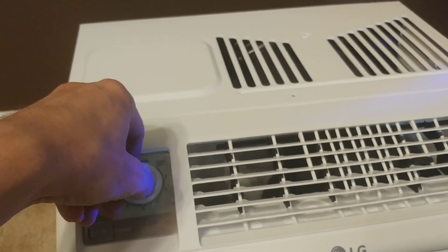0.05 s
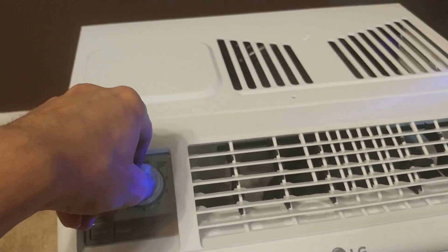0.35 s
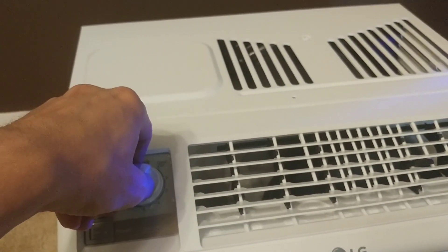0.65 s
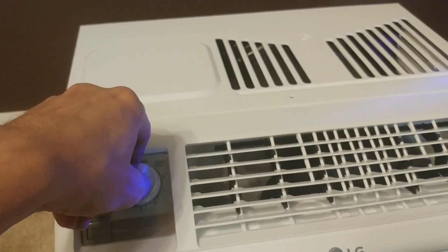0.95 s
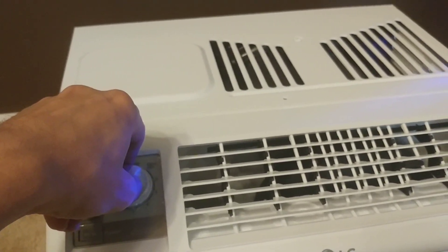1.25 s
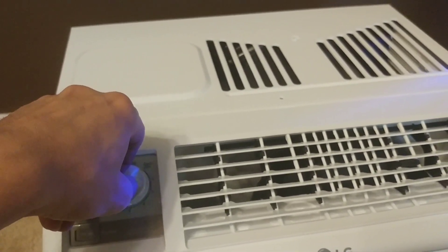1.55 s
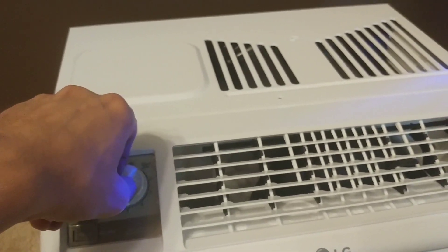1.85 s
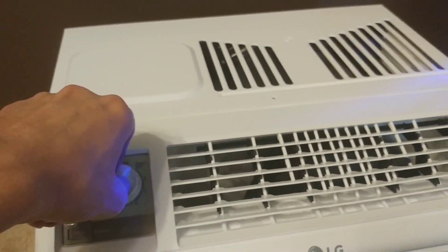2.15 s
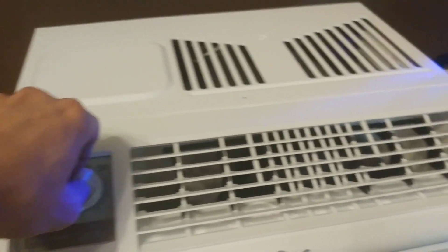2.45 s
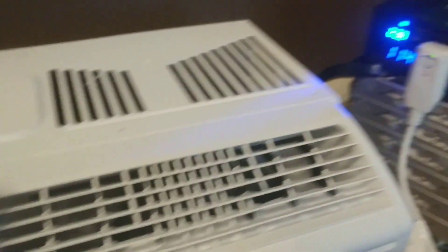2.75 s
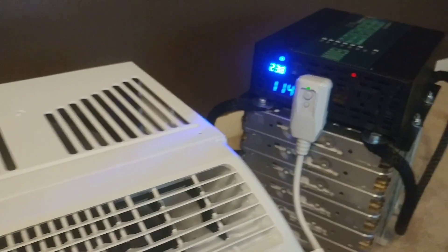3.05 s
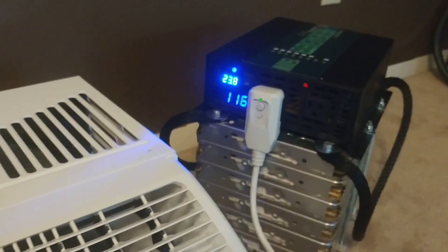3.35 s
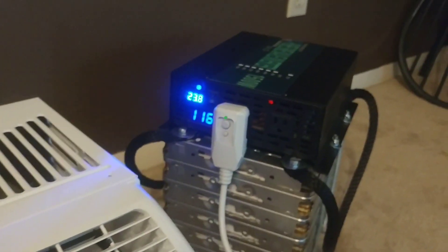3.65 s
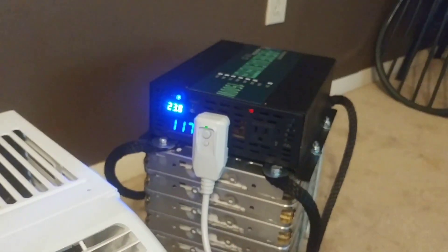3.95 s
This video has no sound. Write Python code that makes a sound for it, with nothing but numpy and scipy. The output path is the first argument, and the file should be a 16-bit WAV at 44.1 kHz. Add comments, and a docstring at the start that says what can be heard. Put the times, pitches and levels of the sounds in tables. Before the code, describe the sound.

A window air conditioner blows, growls briefly, then its compressor catches and hums with a rattle.

```python
"""In a small room, just in front of its grille, a window air conditioner runs from an inverter.
The fan blows throughout, and puffs of its air strike the microphone. The stalled compressor motor
growls for a second while the inverter sizzles and the fan sags. Then the compressor catches and hums,
knocking once a turn and ringing its casing. Late on the listener leans in and moves to the side."""
import sys
import numpy as np
from scipy import signal
from scipy.fft import rfft, irfft
from scipy.io import wavfile
from scipy.ndimage import uniform_filter1d, map_coordinates

SR = 44100
rng = np.random.default_rng(int(sys.argv[2]) if len(sys.argv) > 2 else 0)


def to_wav(sig):
    """Store sig (one row per channel, or 1-D mono) as 16-bit WAV at the path in sys.argv[1].

    Samples outside -1..1 are clipped; the rate is SR.
    """
    pcm = np.clip(np.atleast_2d(sig), -1, 1) * 32767
    pcm = np.round(pcm).astype(np.int16)
    wavfile.write(sys.argv[1], SR, pcm.T)  # frames by channels


N = 176400
T, HZ = np.arange(N) / SR, np.fft.rfftfreq(N, 1 / SR)
MAINS_HZ, TURN_HZ = 60, 59.4

# Spectra of the noises. Each row: frequency in Hz, relative density in dB.
RUSH_SPECTRUM = [(170, -4), (210, -2.5), (265, -3), (320, -2.5), (390, -10), (480, -2.5), (560, 1.5),
                 (650, -2), (750, -1), (860, -3), (1000, -11.5), (1170, -7.5), (1400, -17), (1900, -27.5),
                 (2600, -29.5)]
GRILLE_SPECTRUM = [(1000, -3), (2200, 4.5), (4500, 5.5), (6800, 1), (8200, -8.5), (9000, -22), (15000, -19)]
DRAUGHT_SPECTRUM = [(20, -38), (40, -2.5), (68, 4.5), (95, 0.5), (160, -10.5), (230, -12.5), (400, -39)]
SIZZLE_SPECTRUM = [(1290, -48), (2200, -27), (2720, -14), (3150, -16), (3260, -14), (4700, 1), (4940, -5),
                   (5360, -18), (5820, -8), (6260, -19.5), (7930, -11), (8750, -22), (9890, -19),
                   (13200, -25.5), (15500, -23.5)]
INVERTER_HISS_SPECTRUM = [(7000, -28), (9000, -29), (9700, 9), (13000, 9), (15500, -11)]
CLUNK_SPECTRUM = [(150, 3), (600, 5), (1500, -13), (2600, -7), (5000, -28)]
# Envelopes of the sources. Each row: time in seconds, gain in dB.
RUSH_LEVEL = [(0, -34.5), (.38, -31.5), (.55, -35), (.8, -36.5), (1.12, -38.5), (1.33, -35), (1.5, -37),
              (1.9, -36.5), (2.5, -36.5), (4, -33.5)]
FAN_HUM_LEVEL = [(0, -38), (.35, -39.5), (.7, -45.5), (1.3, -42), (1.7, -40.5), (2.2, -47), (2.6, -40.5),
                 (4, -42)]
GROWL_LEVEL = [(.3, -54), (.38, -29.5), (.5, -42.5), (.65, -42.5), (.76, -42.5), (1, -38.5), (1.32, -39),
               (1.42, -26)]
CHIRP_LEVEL = [(.32, -41), (.42, -33), (.53, -40), (.7, -58), (.745, -34.5), (1.0, -35.5), (1.22, -38),
               (1.3, -59)]
INVERTER_HISS_LEVEL = [(1.25, -90), (1.35, -67), (1.5, -70), (1.62, -65), (2.6, -63.5), (3, -66.5),
                       (4, -66.5)]
HUM_LEVEL = [(1.25, -55), (1.39, -29.5), (1.52, -26.5), (1.7, -28.5), (2.9, -28.5), (4, -28)]
BUZZ_LEVEL = [(1.25, -54.5), (1.4, -45), (1.52, -36.5), (1.65, -33.5), (2.1, -29), (2.7, -30), (3.1, -31.5),
              (4, -38)]
KNOCK_LEVEL = [(1.24, -37), (1.34, -10), (1.42, -13.5), (1.51, -10), (1.58, 0), (1.75, 1.5), (2.7, 1.5),
               (3.2, 0), (3.7, 0), (4, -0.5)]
# Stereo balance. Each row: frequency in Hz, left minus right in dB.
FAN_PAN = [(200, -2), (400, 2.5), (600, 2.5), (850, 1.5), (1150, 5.5), (1600, 5), (2500, -17)]
TREBLE_PAN = [(1300, 5.5), (1900, -1), (2500, -3.5), (3300, -11.5), (4600, -12.5), (6300, -25.5),
              (8000, -20.5), (12000, -16)]
# Coherence of the rush. Each row: frequency in Hz, correlation of left and right.
RUSH_COHERENCE = [(200, 1), (600, 0.88), (1100, 0.73), (2500, 0.25)]
# Puffs of air. Each row: centre in seconds, half width in seconds, level in dB.
PUFFS = [(.01, 0.01, -24), (0.245, 0.042, -27.5), (0.631, 0.014, -27), (.735, 0.011, -19.5),
         (0.908, 0.017, -30), (1.066, 0.021, -28), (1.217, 0.013, -32.5), (1.427, 0.056, -33.5),
         (1.547, 0.016, -25), (2.139, 0.016, -26), (2.374, 0.029, -27.5), (2.42, 0.011, -26.5),
         (2.866, 0.024, -30.5), (3.07, 0.029, -34)]
# Pitch of the sizzle. Each row: time in seconds, frequency ratio.
SIZZLE_PITCH = [(.32, 0.98), (.5, 0.97), (.66, 0.91), (.75, 1), (1.05, 0.99), (1.2, 0.99), (1.35, .94)]
# Speed of the compressor. Each row: time in seconds, turns per second.
ROTOR_SPEED = [(1.3, 61), (1.45, 60.6), (1.53, 58.6), (1.62, 59.8), (1.9, 59.7), (2.2, 59.4), (3, 59.35),
               (3.25, 59.2), (4, 59.35)]
# Harmonics of the buzz at two positions. Each row: multiple of the turning rate, relative level in dB.
ORDERS_FRONT = [(3, -26), (4, -18.5), (5, -7.5), (6, -17.5), (7, -15.5), (8, -14.5), (9, -13.5), (10, -26),
                (11, -16), (12, -10), (13, -17.5), (14, -11), (15, -16.5), (16, -25), (17, -23.5),
                (18, -23.5), (19, -14), (20, -39), (21, -14.5), (22, -17), (23, -21.5)]
ORDERS_SIDE = [(3, -16), (4, -27), (5, -6.5), (6, -32), (7, -27.5), (8, -18), (9, -13), (10, -20.5),
               (11, -17.5), (12, -21), (13, -13.5), (14, -12), (15, -19.5), (16, -22), (17, -22), (18, -22),
               (19, -16.5), (20, -30), (21, -26), (22, -19), (23, -28.5)]
# Response of the casing at three positions. Each row: frequency in Hz, relative density in dB.
CASING_FRONT = [(790, -29), (1350, -1.5), (1380, -20), (1830, -21), (1870, -26), (2020, -14.5), (2470, -17),
                (2610, -20), (3080, -18), (3420, -21.5), (4370, -19), (4580, -31), (5160, -14.5),
                (5600, -30), (5740, -12.5), (5960, -9.5), (6980, -10.5), (9000, -43), (11700, -72),
                (19800, -120)]
CASING_CLOSE = [(790, -25), (1350, -2.5), (1650, -6.5), (1690, -19), (1830, -11.5), (2800, -17),
                (3080, -4.5), (3420, -11.5), (4370, -17), (4730, -32), (5080, -10), (5630, -9),
                (5910, -3.5), (6870, 0.5), (9000, -36), (11700, -65), (19800, -120)]
CASING_SIDE = [(790, -38), (1350, -19), (1380, -0.5), (1530, -7), (1690, -9), (1900, -7.5), (1990, -12),
               (2140, -10), (2320, -19), (2410, -11.5), (2780, -9), (3130, -6), (3470, -20.5), (3880, -14),
               (5460, -13.5), (5600, -20), (5730, -2.5), (5960, -2), (7150, -7.5), (9000, -38),
               (11700, -65), (19800, -120)]
# Harmonics that the casing singles out. Each row: frequency in Hz, relative level in dB.
RINGS_FRONT = [(1486, -57), (1604, -61), (1787, -63), (2024, -68), (2083, -65), (2202, -64), (2379, -62),
               (2439, -58), (2498, -68), (2616, -68), (2740, -59), (2972, -55), (3090, -65), (3155, -64),
               (3208, -66), (3268, -63)]
RINGS_CLOSE = [(2433, -59), (2966, -58), (4274, -63), (5222, -55), (5997, -53), (6115, -52), (6352, -54),
               (6708, -54), (7063, -53), (7359, -63)]
RINGS_SIDE = [(1604, -61), (1841, -59), (1900, -58), (2073, -64), (2907, -62), (3144, -62), (3203, -62),
              (4032, -63), (4570, -65), (4985, -66), (5222, -65), (5755, -58), (6051, -57), (6288, -62)]
# Phase between the microphone ports. Each row: frequency in Hz, lead of the left in radians.
PORT_PHASE = [(0, 0), (600, -.25), (1150, -1), (1900, -1.7), (2400, -2.2), (3190, -4.5), (6600, -9)]


def from_db(db):
    """Amplitude grows tenfold in 20 dB."""
    return 10 ** (np.asarray(db) / 20)


def rms_one(x):
    """Normalisation to unit mean power."""
    return x / np.sqrt(np.mean(x ** 2) + 1e-20)


def in_time(rows):
    """Linear interpolation of a curve at every sample."""
    return np.interp(T, *np.transpose(rows))


def at_hz(points, hz=HZ):
    """Interpolation on a logarithmic frequency axis."""
    freqs, values = np.transpose(points)
    return np.interp(np.log(hz + 1e-6), np.log(freqs), values)


def colour(points, hz):
    """A magnitude response that falls 48 dB per octave beyond its ends."""
    octaves_outside = np.abs(np.log2((hz + 1e-6) / np.clip(hz, points[0][0], points[-1][0])))
    return from_db(at_hz(points, hz) - 48 * octaves_outside)


def pan(db):
    """A level difference, left minus right, at constant power."""
    gains = from_db(np.atleast_1d(db) * np.array([[.5], [-.5]]))
    return gains / np.sqrt(np.mean(gains ** 2, axis=0))


def noise(spectrum, pan_db, coherence):
    """Independent mid and side noises add to a partly coherent pair of unit power."""
    mid, side = rfft(rng.standard_normal((2, N)))
    pair = np.sqrt(1 + coherence) * mid + np.sqrt(1 - coherence) * side * [[1], [-1]]
    return rms_one(irfft(pair * colour(spectrum, HZ) * pan(pan_db), N))


def drift(rate_hz):
    """Low-pass noise gives a slow fluctuation of unit power."""
    return rms_one(irfft(rfft(rng.standard_normal(N)) / (1 + (HZ / rate_hz) ** 2), N))


def swell(centre_s, half_s):
    """A Gaussian rise and fall."""
    return np.exp(-.5 * ((T - centre_s) / half_s) ** 2)


def fan(grille_db=-49.5):
    """Turbulence in blower and grille radiates broadband noise; the motor hums at twice the mains rate."""
    rush = noise(RUSH_SPECTRUM, at_hz(FAN_PAN), at_hz(RUSH_COHERENCE))
    rush *= from_db(in_time(RUSH_LEVEL) + 1.36 * drift(9.1))
    hiss = noise(GRILLE_SPECTRUM, at_hz(TREBLE_PAN), coherence=.041) * from_db(grille_db)
    hum = np.sqrt(2) * np.sin(4 * np.pi * MAINS_HZ * T)
    return rush + hiss + hum * from_db(in_time(FAN_HUM_LEVEL) + .73 * drift(2))


def draught(level_db=-38.5):
    """Eddies press on the microphone as a rumble, with stronger puffs at the right port."""
    rumble = noise(DRAUGHT_SPECTRUM, pan_db=0, coherence=.44) * from_db(level_db + 1.9 * drift(21))
    eddies = noise(DRAUGHT_SPECTRUM, pan_db=-17.5, coherence=.66)
    eddies /= np.sqrt(uniform_filter1d(np.mean(eddies ** 2, axis=0), size=1100) + 1e-6)  # even level
    return rumble + eddies * sum(from_db(db) * swell(s, half_s) for s, half_s, db in PUFFS)


def inverter_chirps(cycles, pitch_hz=4690, half_s=.0015):
    """The loaded inverter emits one Gaussian tone pulse in each mains cycle."""
    nearest = np.round(cycles).astype(int)
    size, detune = rng.standard_normal((400, 2))[nearest].T
    offset_s = (cycles - nearest) / MAINS_HZ
    tone = np.sin(2 * np.pi * pitch_hz * (1 + .014 * detune) * offset_s)
    pulses = np.exp(-.5 * (offset_s / half_s) ** 2) * tone
    return pulses * from_db(in_time(CHIRP_LEVEL) + 3 * np.minimum(size, 1)) * pan(-32)


def inverter_sizzle(cycles, level_db=-44, depth=.16):
    """The inverter's noise is amplitude-modulated at twice the mains rate and wavers in pitch."""
    throb = rms_one(1 + depth * np.cos(4 * np.pi * cycles)) * from_db(level_db + drift(41))
    sizzle = noise(SIZZLE_SPECTRUM, at_hz(TREBLE_PAN), coherence=.13)
    read_at = np.cumsum(in_time(SIZZLE_PITCH))
    return throb * np.array([map_coordinates(side, [read_at], order=5, mode="wrap") for side in sizzle])


def stalled_motor(on_s=.313, off_s=1.402, attack_s=.013, release_s=.061):
    """Forced vibration: the motor growls at four times the mains rate while it loads the inverter."""
    gate = np.clip((T - on_s) / attack_s, 0, 1) * np.clip((off_s - T) / release_s, 0, 1)
    cycles = (T - .74) * MAINS_HZ  # counted from a chirp at 0.74 s
    inverter = inverter_chirps(cycles) + inverter_sizzle(cycles)
    growl = np.sqrt(2) * np.sin(8 * np.pi * cycles + .34 * drift(10)) * from_db(in_time(GROWL_LEVEL))
    return gate * (inverter + growl)


def inverter_hiss():
    """A high band of incoherent noise persists while the inverter carries the compressor."""
    return noise(INVERTER_HISS_SPECTRUM, pan_db=-11.5, coherence=0) * from_db(in_time(INVERTER_HISS_LEVEL))


def clunk(at_s=1.345, half_s=.036, level_db=-38.5):
    """The rotor breaks free with a soft broadband transient."""
    return noise(CLUNK_SPECTRUM, pan_db=2, coherence=.95) * swell(at_s, half_s) * from_db(level_db)


def cabinet_hum(turns, moved, lag_turns=.2008, scatter_cycles=.14):
    """The cabinet shakes at the turning rate; its harmonics add nearly in phase after each knock."""
    fundamental = np.sin(2 * np.pi * turns) * from_db(in_time(HUM_LEVEL)) * pan(3 * moved)
    buzz = 0
    for (order, front_db), (_, side_db) in zip(ORDERS_FRONT, ORDERS_SIDE):
        phase = order * (turns - lag_turns) + scatter_cycles * rng.standard_normal()
        level_db = front_db + moved * (side_db - front_db) + .79 * drift(3.7)
        balance = pan(1.86 * at_hz(FAN_PAN, order * TURN_HZ))
        buzz += np.cos(2 * np.pi * phase) * from_db(level_db) * balance
    return np.sqrt(2) * (fundamental + buzz * from_db(in_time(BUZZ_LEVEL)))


def knock_envelope(turns, attack_turns=.03, decay_turns=.15, tail=.13):
    """An impact rises sharply and decays exponentially into the ring of the casing."""
    part = turns % 1
    return rms_one(np.minimum(part / attack_turns, 1) * np.exp(-part / decay_turns) + tail)


def knocks(turns, burst, casing, rings, level_db, ring_boost_db=4, rattle_share=.1):
    """Periodic impacts give a line spectrum, shaped by casing resonances; a small share is random."""
    size = burst.shape[1]
    lines = rfft(burst)
    hz = np.arange(lines.shape[1]) * TURN_HZ
    strength = colour(casing, hz)
    strength = strength / np.sqrt(np.sum(strength ** 2)) * from_db(level_db)
    for ring_hz, db in rings:
        order = round(ring_hz / TURN_HZ)
        strength[order] = np.hypot(strength[order], from_db(db + ring_boost_db))
    flattened = lines / np.abs(lines) * rms_one(np.abs(lines) ** .13)  # the phases keep the attack
    one_turn = irfft(flattened * strength * pan(at_hz(TREBLE_PAN, hz))) * size / np.sqrt(2)
    periodic = np.array([np.interp(turns % 1, np.arange(size) / size, side) for side in one_turn])
    rattle = noise(casing, at_hz(TREBLE_PAN), coherence=.046) * knock_envelope(turns) * from_db(level_db)
    return np.sqrt(1 - rattle_share) * periodic + np.sqrt(rattle_share) * rattle


def compressor(move_from_s=2.41, move_to_s=3.1, knock_at_s=2.036, turn_samples=4096):
    """Radiation is directional, so hum and knocks change colour as the listener moves."""
    turns = np.cumsum(in_time(ROTOR_SPEED)) / SR
    turns = turns - np.interp(knock_at_s, T, turns) + .0004 * drift(8)
    moved = np.clip((T - move_from_s) / (move_to_s - move_from_s), 0, 1)
    leaning = swell(centre_s=2.686, half_s=.12)
    burst = rng.standard_normal(turn_samples) + .5 * rng.standard_normal((2, turn_samples))
    burst *= knock_envelope(np.arange(turn_samples) / turn_samples)
    front = knocks(turns, burst, CASING_FRONT, RINGS_FRONT, level_db=-39)
    close = knocks(turns, burst, CASING_CLOSE, RINGS_CLOSE, level_db=-39)
    side = knocks(turns, burst, CASING_SIDE, RINGS_SIDE, level_db=-40)
    knocking = (1 - leaning) * ((1 - moved) * front + moved * side) + leaning * close
    return clunk() + cabinet_hum(turns, moved) + knocking * from_db(in_time(KNOCK_LEVEL) + .77 * drift(60))


def ports(sound):
    """A phase lag growing with frequency delays the sound at the left port."""
    lag = np.exp(1j * np.interp(HZ, *np.transpose(PORT_PHASE)))
    return np.array([irfft(rfft(sound[0]) * lag, N), sound[1]])


def scene():
    """Superposition: the radiated sounds add to the draught on the microphone."""
    return ports(fan() + stalled_motor() + inverter_hiss() + compressor()) + draught()


def record(dry, low_hz=24, high_hz=15800):
    """Band limiting rolls off the deepest rumble and cuts the top steeply."""
    lean = signal.sosfilt(signal.butter(2, low_hz, "high", fs=SR, output="sos"), dry)
    return signal.sosfilt(signal.ellip(12, .1, 80, high_hz, fs=SR, output="sos"), lean)


dry = scene()
out = record(dry)
to_wav(out)
```